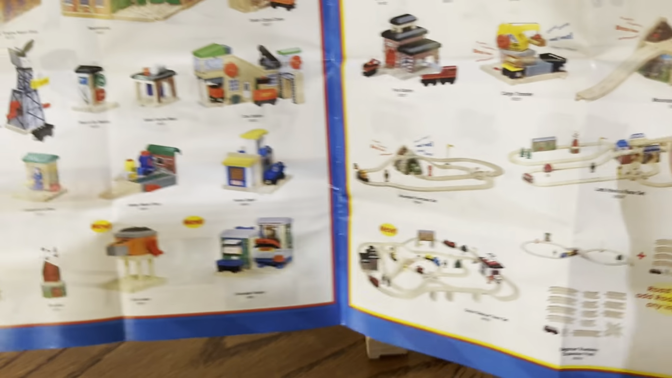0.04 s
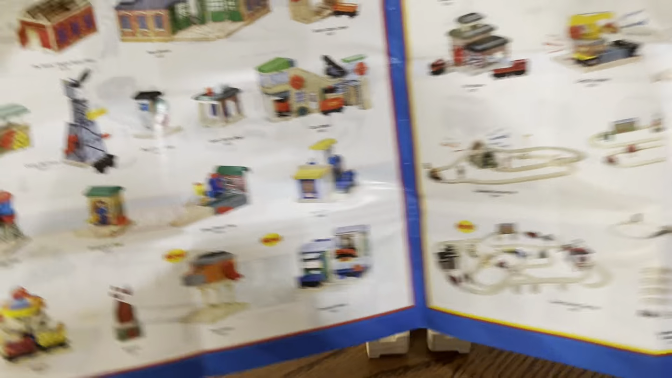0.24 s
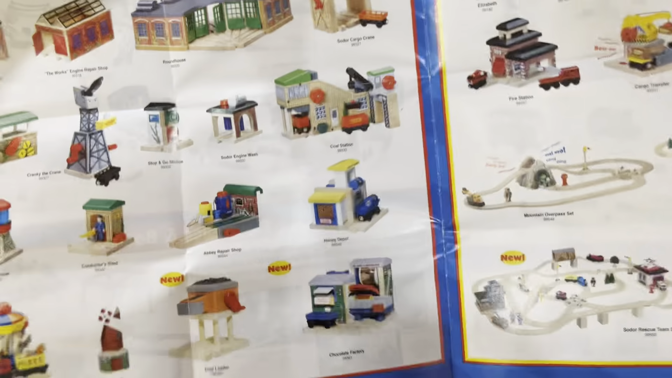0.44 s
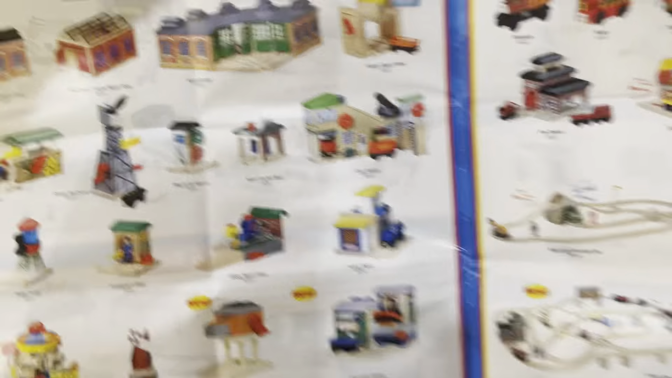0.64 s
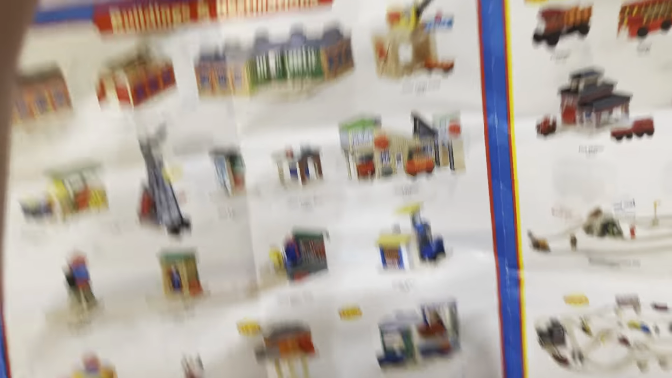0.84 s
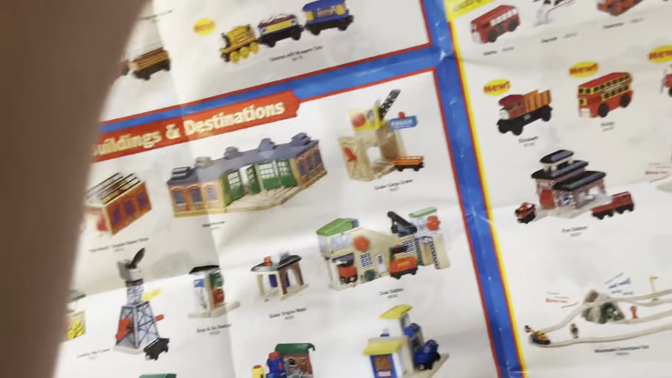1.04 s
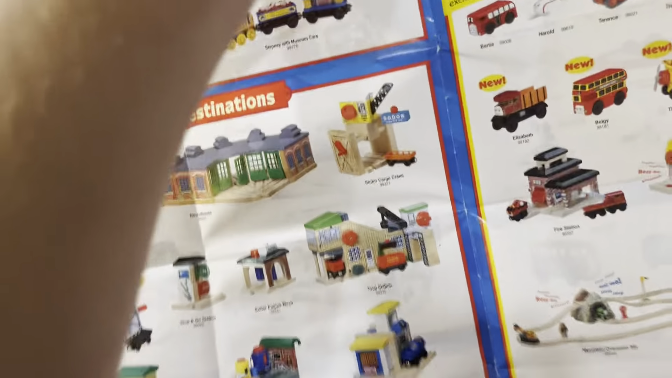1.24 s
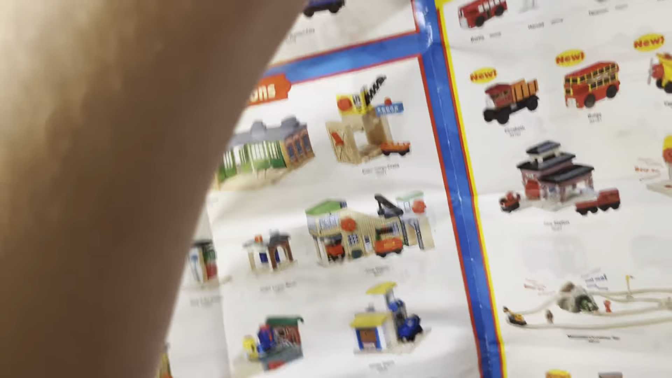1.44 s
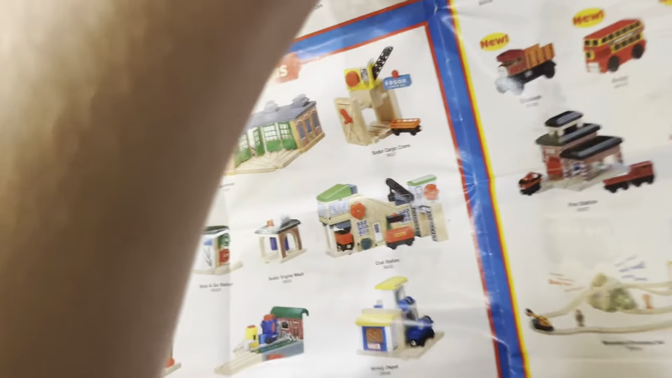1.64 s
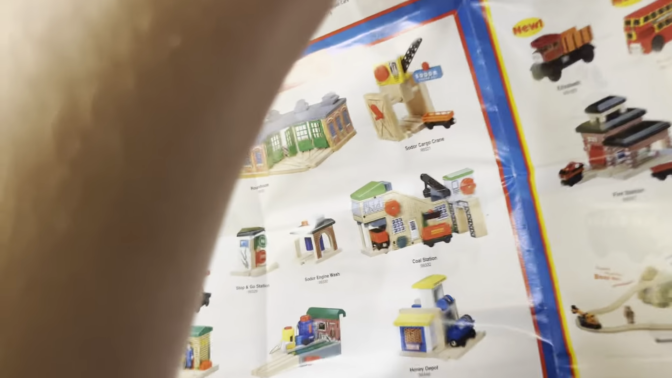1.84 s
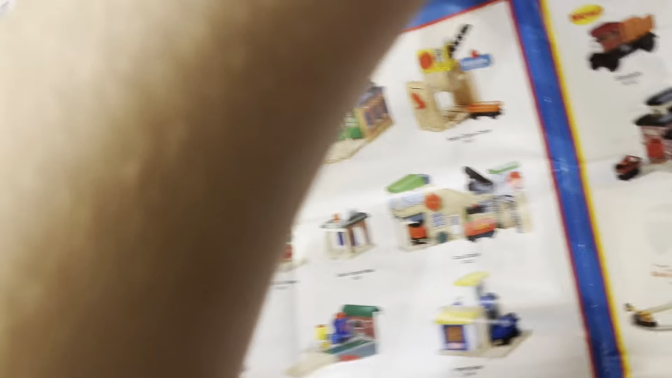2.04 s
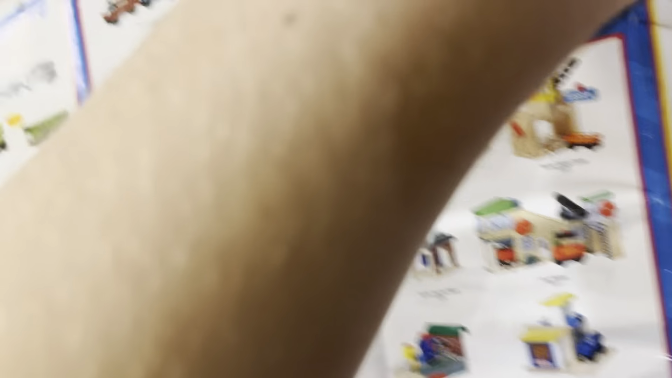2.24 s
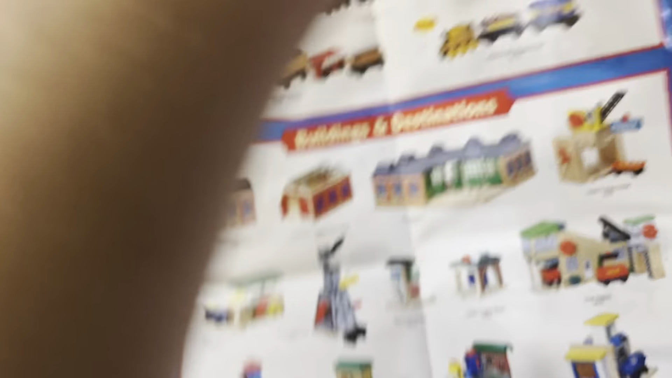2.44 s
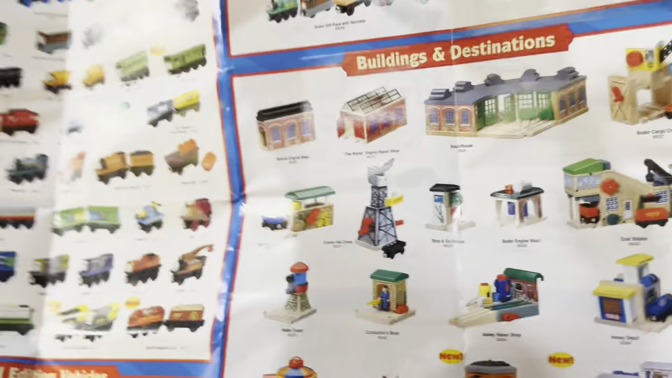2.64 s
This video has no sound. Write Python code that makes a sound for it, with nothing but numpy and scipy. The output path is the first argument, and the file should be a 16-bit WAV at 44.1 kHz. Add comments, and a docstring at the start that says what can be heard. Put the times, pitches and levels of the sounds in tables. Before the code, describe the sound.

A large folded paper leaflet is handled close to a stereo microphone in a small quiet room: irregular crisp crease snaps and crinkles, busiest in the first second, then sparser, with soft low flaps and brief sliding.

```python
"""Sharp creases snap through as a folded paper leaflet is opened close by in a quiet room.
The whole panel flaps with soft low thumps and smaller patches buckle dully: sagging damped sines.
Between the snaps the paper crinkles and slides (ringing random clicks), flutters and sways (shaped noise).
A short room tail and a faint steady noise lie behind; a microphone pair colours the whole."""
import sys
import numpy as np
from scipy import signal
from scipy.fft import rfft, irfft
from scipy.io import wavfile

SR = 44100
rng = np.random.default_rng(int(sys.argv[2]) if len(sys.argv) > 2 else 0)


def put_to_file(sound):
    """Save the sound as 16-bit audio at rate SR, in the file named by the first command-line argument."""
    columns = np.atleast_2d(sound).T  # one column per channel
    safe = np.clip(columns, -1, 1)
    whole_steps = np.round(safe * 32767)
    wavfile.write(sys.argv[1], SR, whole_steps.astype(np.int16))


N = 119070


def amp(db):
    """Decibels to gain."""
    return 10 ** (np.asarray(db) / 20)


def unit_rms(x):
    """Scales to unit rms over both channels."""
    return x / np.sqrt(np.mean(x ** 2) + 1e-20)


def read(points, hz):
    """Interpolates a table on a log-frequency axis."""
    table_hz, value = np.transpose(points)
    return np.interp(np.log(hz + 1), np.log(table_hz + 1), value)


def gain_curve(points):
    """Gain per sample from (time_s, level_db) points."""
    return amp(np.interp(np.arange(N) / SR, *np.transpose(points)))


def add(mix, start_s, sound):
    """Mixes a sound in at a time, cut at the end of the mix."""
    part = mix[:, max(round(start_s * SR), 0):][:, :sound.shape[-1]]
    part += sound[..., :part.shape[1]]


# Left-right correlation, clipped to +-0.999 on use: freq_hz, correlation
CORRELATION = [(60, 1.06), (200, 0.79), (500, 0.78), (1000, 0.29), (2200, 0.63), (5000, 0.8), (8000, -0.1),
               (15000, 41)]


def paired(x):
    """Blends two unrelated signals into a left and right correlated by band."""
    size = x.shape[1]
    a, b = rfft(x, 2 * size)
    same = np.clip(read(CORRELATION, np.fft.rfftfreq(2 * size, 1 / SR)), -.999, .999)
    mid = a * np.sqrt((1 + same) / 2)
    side = b * np.sqrt((1 - same) / 2)
    return irfft(np.array([mid + side, mid - side]))[:, :size]


def coloured(x, colour):
    """Pairs two signals and shapes their spectrum, at unit rms."""
    gain = amp(read(colour, np.fft.rfftfreq(N, 1 / SR)))
    return unit_rms(irfft(rfft(paired(x)) * gain, N))


# Spectral band centres of a snap [Hz]: body, reference, treble, air
SNAP_BANDS_HZ = [500, 1900, 5000, 12000]
# Ring of the sheet's modes: mode_hz, multiple of the snap's ring_s
RING_SCALE = [(150, 2.3), (500, 1.72), (1900, 1.19), (5000, 0.89), (9000, .5), (14000, 0.55)]
SNAP_DB, SNAP_RISE_S, SNAP_LOW_HZ = -.5, 0.00039, 197
SHEET_DB, SHEET_S = -22, 0.0096  # the bend spreads over the sheet and lingers
# The two notes stand out of an uneven cluster of modes
NOTE_DB, NOTE_OCTAVES, RIPPLE_DB, RIPPLE_HZ = 10.5, 0.14, 3.5, 219.7


def snap(level_db, body_db, treble_db, air_db, panel_hz, crease_hz, ring_s, pan_db, count=11):
    """A crease pops through: the sheet's dense modes start together and die in milliseconds, low ones last."""
    size = 4096
    t, hz = np.arange(size) / SR, np.fft.rfftfreq(size, 1 / SR)
    centres_hz = np.geomspace(150, 15000, count)
    colour = list(zip(SNAP_BANDS_HZ, [body_db, 0, treble_db, air_db]))

    ripple = np.interp(hz / RIPPLE_HZ, np.arange(size), rng.standard_normal(size))
    notes = sum(np.exp(-(np.log2((hz + 1) / note_hz) / NOTE_OCTAVES) ** 2)
                for note_hz in (panel_hz, crease_hz))
    noise = rfft(paired(rng.standard_normal((2, size))))
    modes = noise * amp(RIPPLE_DB * ripple + NOTE_DB * notes)

    rise = 1 - np.exp(-t / SNAP_RISE_S)
    linger = amp(SHEET_DB) * np.exp(-t / SHEET_S)
    out = 0
    for centre_hz, pick in zip(centres_hz, np.eye(count)):
        share = np.interp(np.log(hz + 1), np.log(centres_hz), pick)  # triangular band
        decay_s = max(ring_s, 1e-4) * read(RING_SCALE, centre_hz)
        ring = irfft(modes * share) * rise * (np.exp(-t / decay_s) + linger)
        weight = np.sqrt(np.sum(share * amp(NOTE_DB * notes)) / size)
        low_cut = 1 / (1 + (SNAP_LOW_HZ / centre_hz) ** 4)
        out = out + unit_rms(ring) * weight * low_cut * amp(read(colour, centre_hz))
    return out * amp(SNAP_DB + level_db + np.array([[pan_db], [-pan_db]]) / 2)


# Crease snaps: start_s, level_db (before SNAP_DB), body_db, treble_db, air_db (relative to level),
# panel_hz, crease_hz, ring_s (before RING_SCALE), pan_db (left minus right)
CREASE_SNAPS = [(0.002, -42.5, 8, -7, -16, 570, 3570, 0.0053, 4.5),
                (0.1694, -50.5, 13, -18, -27, 465, 1890, 0.011, 3),
                (0.217, -51.5, -1, -12, -23, 410, 1980, 0.0048, -3),
                (0.2525, -33.5, 0.5, -7.5, -30.5, 1430, 3660, 0.0049, -3),
                (0.2932, -32, 5, -4.5, -19, 475, 4180, 0.003, -1.5),
                (0.3198, -55, 1, -8, -18, 410, 4320, 0.0083, 6),
                (0.3593, -53.5, 16.5, -4.5, -18, 430, 3430, 0.0074, -2.5),
                (0.4047, -48.5, 11.5, -15, -13, 445, 2550, 0.0047, -1.5),
                (0.4248, -54.5, 14, -18, -23, 1590, 1800, 0.007, 3),
                (0.4395, -34.5, -11, -17.5, -50, 1570, 3700, 0.0031, 0.5),
                (0.4866, -57.5, 17.5, -20, -9, 503, 3270, 0.0041, -5),
                (0.517, -40.5, -1, -6.5, -1.5, 1550, 4290, 0.0074, -2.5),
                (0.5232, -40.5, 2, -5, -42, 458, 3250, 0.0035, -1),
                (0.5456, -35.5, -8, -37, -43, 1010, 2040, 0.0036, 5.5),
                (0.5673, -28.5, 5, -9, -15.5, 1380, 4380, 0.0028, 0),
                (0.6001, -53, 13, -14, -29, 394, 1810, 0.01, 13),
                (0.6709, -36.5, 7.5, -8, -13, 900, 2500, 0.0025, 1),
                (0.7906, -41.5, 3, -13, -16, 1360, 2760, 0.019, -9),
                (0.8018, -33.5, -2, -19, -33, 1520, 4350, 0.0098, 3.5),
                (0.8089, -30.5, -5, 0, 1, 1650, 4190, 0.0027, 0.5),
                (0.8549, -52, -4, -18, -25, 1570, 2290, 0.0067, -3),
                (0.8659, -28.5, -11, -6, -6.5, 1640, 2340, 0.0044, 0),
                (0.891, -27, 4, -9.5, -26, 568, 2370, 0.0044, 1.5),
                (0.9003, -44.5, 4, -6, -26, 890, 2590, 0.0051, 18),
                (0.9352, -48, -2, -29, -24, 1130, 2040, 0.0049, -1),
                (0.9663, -54.5, 12.5, -11, -25, 397, 2280, 0.0064, 19),
                (0.9886, -46, 13.5, -6.5, -2, 480, 6200, 0.0079, 2.5),
                (1.0258, -47, 11.5, -23, -20, 910, 1770, 0.0046, 3),
                (1.1728, -42, 2.5, -11.5, -18, 405, 4070, 0.01, -0.5),
                (1.3684, -49, 14.5, -12, -20, 455, 4060, 0.011, -3),
                (1.3937, -45.5, 11, -2.5, -21, 834, 4150, 0.0049, -2),
                (1.4171, -36, -2, -16, -47, 1570, 2260, 0.0031, -0.5),
                (1.442, -27.5, -2.5, -1, -10.5, 1770, 3070, 0.0023, 0.5),
                (1.4716, -50.5, 5, -4, -22, 444, 5260, 0.0018, 0),
                (1.6631, -46.5, 6, -20, -21, 1440, 1900, 0.0097, -4.5),
                (1.7012, -48, 17, -21, -20, 410, 2700, 0.0049, -2),
                (1.7579, -51, 17, -21, -11, 483, 2010, 0.0068, -7),
                (1.7666, -47, 8, -11, -6.5, 1400, 1980, 0.0098, -3),
                (1.7896, -45, 7, -16, -14, 790, 1950, 0.01, -4),
                (1.8981, -42, 11.5, -29, -49, 444, 2630, 0.0053, -14.5),
                (1.9033, -37, 9.5, -27.5, -56, 448, 2700, 0.0058, 5.5),
                (1.9104, -42.5, 16, -38, -39, 437, 1920, 0.0031, -4),
                (1.9326, -58.5, 26.5, -10, -4, 503, 2100, 0.0086, 2),
                (1.957, -49, 14, -16.5, -21, 467, 2280, 0.0025, -2),
                (2.05, -50, 14, -19, -18, 760, 3350, 0.0099, 0),
                (2.0629, -42.5, 12.5, -13, -30, 770, 3360, 0.0082, -1),
                (2.0887, -36, 8.5, 1.5, -23, 640, 3770, 0.0057, 0.5),
                (2.1145, -50.5, 13, -14, -41, 790, 2990, 0.0051, -10),
                (2.2591, -52.5, 11, -8, -9, 1180, 4390, 0.004, -1),
                (2.306, -44, 8.5, -27, -22, 1430, 2820, 0.0083, -3.5),
                (2.337, -52, 17, 0.5, -16, 465, 2110, 0.0033, 0),
                (2.3962, -36, 3, -21, -53, 1170, 2310, 0.0043, -2.5),
                (2.424, -38, 1, -7, -18.5, 1400, 2400, 0.0036, 0)]


def snaps():
    """All the creases popping through."""
    out = np.zeros((2, N))
    for start_s, *settings in CREASE_SNAPS:
        add(out, start_s, snap(*settings))
    return out


SWING_SAG = 0.085  # fraction of the starting pitch


def swing(level_db, pitch_hz, decay_s, rise_s):
    """A damped swing of a stretch of paper, its pitch sagging as it relaxes."""
    t = np.arange(SR // 4) / SR
    decay = np.exp(-t / decay_s)
    turns = np.cumsum(pitch_hz * (1 - SWING_SAG * (1 - decay))) / SR
    return amp(level_db) * (1 - np.exp(-t / rise_s)) * decay * np.sin(2 * np.pi * turns)


# Flaps of the whole panel: start_s, level_db (before the envelope), pitch_hz (before sag), decay_s
PANEL_FLAPS = [(0.224, -21.5, 59.4, 0.0073), (0.26, -60, 75, 0.023), (.345, -32, 66.3, 0.023),
               (0.403, -38, 89, 0.011), (0.529, -39, 102.4, 0.036), (.792, -27.5, 75.6, 0.03),
               (0.926, -27.5, 116, 0.017), (1.0, -36, 69.4, .025), (1.17, -19, 64, 0.016),
               (1.244, -32.5, 88, 0.027), (1.386, -31, 63, 0.022), (1.447, -21.5, 115, 0.0088),
               (1.706, -28, 125.5, 0.011), (1.765, -32, 118.6, 0.0091), (1.955, -36, 160, 0.015),
               (2.062, -40, 84.2, 0.074), (2.337, -35, 64.9, 0.042)]


def flaps():
    """The whole panel swings as one: soft low thumps."""
    out = np.zeros((2, N))
    for start_s, level_db, pitch_hz, decay_s in PANEL_FLAPS:
        add(out, start_s, swing(level_db, pitch_hz, decay_s, rise_s=.005))
    return out


# Buckles of a smaller patch: start_s, level_db (before mode level), pitch_hz (before mode ratio), decay_s
PATCH_BUCKLES = [(.176, -42.5, 392, 0.016), (.256, -33, 320, 0.0094), (.324, -38, 293, 0.009),
                 (.524, -31, 308, 0.012), (.601, -36, 327, .01), (0.788, -30, 275, 0.013),
                 (.893, -26.5, 543, 0.01), (1.702, -37.5, 422, 0.0084), (1.902, -34, 449, 0.0095),
                 (2.089, -36, 703, .012), (2.305, -46.5, 322, 0.012), (2.544, -37, 293, 0.013)]
# Modes of a patch: pitch_ratio (before random detune), level_db (relative to the buckle)
PATCH_MODES = [(.6, -6), (.8, -10.5), (1, 0.5), (1.24, -5), (1.55, -6), (2.05, -13), (2.7, -17.5)]


def buckles():
    """A smaller patch gives way: dull knocks of several damped modes, alternating in sign."""
    out = np.zeros((2, N))
    for start_s, level_db, pitch_hz, decay_s in PATCH_BUCKLES:
        for k, (ratio, mode_db) in enumerate(PATCH_MODES):
            mode_hz = pitch_hz * ratio * rng.uniform(0.93, 1.04)
            mode = swing(level_db + mode_db, mode_hz, decay_s, rise_s=.0025)
            add(out, start_s, (-1) ** k * mode)
    return out


def grains(per_s, spread_db, ring_s, count=12):
    """Random tiny clicks of uneven size, each ringing one of several patches of paper."""
    size = amp(spread_db * np.minimum(rng.exponential(1, N), 4))
    clicks = size * (rng.random(N) < per_s / SR)
    patch, t = rng.integers(0, count, N), np.arange(SR // 50) / SR
    rings = rng.standard_normal((count, 2, len(t))) * np.exp(-t / ring_s)
    return sum(signal.oaconvolve((clicks * (patch == k))[None], rings[k], axes=1)[:, :N]
               for k in range(count))


# Bending of the sheet: time_s, level_db (before CRINKLE_DB)
BENDING_LEVEL = [(0, -42.5), (.06, -60), (.13, -63), (.19, -59), (.23, -60), (.28, -48.5), (.35, -61.5),
                 (.42, -48), (.47, -57), (.53, -38.5), (.59, -43), (.65, -58), (.7, -53), (.76, -57),
                 (.83, -43.5), (.91, -33.5), (.96, -49.5), (1.02, -48), (1.13, -61), (1.19, -48.5),
                 (1.28, -65.5), (1.34, -61), (1.4, -42), (1.46, -38.5), (1.53, -60.5), (1.62, -60),
                 (1.68, -56), (1.78, -47.5), (1.86, -56.5), (1.92, -48), (2.02, -72), (2.08, -43.5),
                 (2.12, -59), (2.2, -59.5), (2.3, -49.5), (2.42, -47.5), (2.5, -59.5), (2.55, -55),
                 (2.62, -63.5), (2.7, -56)]
# Crinkle spectrum shape: freq_hz, gain_db
CRINKLE_SHAPE = [(150, -2), (400, 3.5), (900, 0), (1600, -2.5), (2400, -7), (4000, -11), (7000, -28.5),
                 (15000, -85)]
CRINKLE_DB = -4


def crinkle():
    """Bending sets off many small crinkles, each a brief ring."""
    clicks = grains(per_s=1000, spread_db=4, ring_s=0.004)
    return amp(CRINKLE_DB) * coloured(clicks, CRINKLE_SHAPE) * gain_curve(BENDING_LEVEL)


# Sliding of paper on paper and skin: time_s, level_db (before SLIDE_DB)
SLIDING_LEVEL = [(0, -64), (.12, -71.5), (.22, -69.5), (.28, -66), (.34, -64), (.41, -61), (.47, -63),
                 (.52, -52), (.59, -60), (.65, -57), (.75, -67.5), (.79, -61), (.83, -55), (.92, -43),
                 (1, -55.5), (1.13, -64), (1.19, -54), (1.24, -59.5), (1.34, -61), (1.46, -54), (1.52, -60),
                 (1.62, -65), (1.73, -67), (1.78, -46), (1.85, -64.5), (1.94, -63), (2, -81), (2.1, -60),
                 (2.17, -70), (2.3, -50.5), (2.39, -59.5), (2.47, -47), (2.55, -63.5), (2.7, -63.5)]
# Slide spectrum shape: freq_hz, gain_db
SLIDE_SHAPE = [(500, -1), (1500, -12), (3500, -4.5), (6000, -3), (8000, -9), (11000, -3.5), (14000, -7),
               (16000, -3)]
SLIDE_DB = -1.5


def slide():
    """Rubbing fibres catch and release: a dense hiss of shorter clicks."""
    clicks = grains(per_s=12000, spread_db=6, ring_s=0.0016)
    return amp(SLIDE_DB) * coloured(clicks, SLIDE_SHAPE) * gain_curve(SLIDING_LEVEL)


# Flutter of the loose sheet: time_s, level_db (before FLUTTER_DB)
FLUTTER_LEVEL = [(0.0, -41), (0.07, -66.5), (0.3, -35.5), (0.34, -56.5), (0.43, -37), (0.47, -53.5),
                 (0.57, -34), (0.65, -67), (0.68, -38.5), (0.74, -87), (0.8, -33.5), (0.85, -44),
                 (0.9, -39.5), (0.93, -41.5), (1.16, -54.5), (1.18, -43), (1.3, -57.5), (1.37, -45.5),
                 (1.46, -44), (1.5, -67), (1.64, -59), (1.71, -44.5), (1.74, -53), (1.77, -39.5),
                 (1.87, -67), (1.9, -45.5), (2.01, -52), (2.1, -58), (2.18, -61.5), (2.32, -44.5),
                 (2.52, -54), (2.55, -40.5), (2.65, -93), (2.7, -56)]
# Flutter spectrum shape: freq_hz, gain_db
FLUTTER_SHAPE = [(60, -28), (130, -3.5), (200, -1), (300, 0), (450, -1.5), (700, -16), (1500, -34),
                 (5000, -70)]
FLUTTER_DB = -4


def flutter():
    """The loose sheet flutters: low-mid noise in bursts."""
    noise = coloured(rng.standard_normal((2, N)), FLUTTER_SHAPE)
    return amp(FLUTTER_DB) * noise * gain_curve(FLUTTER_LEVEL)


# Sway of the panel: time_s, level_db (before SWAY_DB)
SWAY_LEVEL = [(0.0, -46.5), (0.18, -63.5), (0.23, -35.5), (0.49, -50), (0.55, -33), (0.6, -44.5),
              (0.78, -42), (0.8, -35.5), (1.14, -53), (1.17, -47.5), (1.33, -50.5), (1.46, -40.5),
              (1.62, -65), (1.7, -56), (2.27, -50), (2.35, -38.5), (2.63, -71.5), (2.7, -53.5)]
# Sway spectrum shape: freq_hz, gain_db
SWAY_SHAPE = [(15, -33), (35, -13), (62, 0), (85, -3.5), (130, -9.5), (200, -20), (500, -60.5), (2000, -78)]
SWAY_DB = -2.5


def sway():
    """The panel sways: bass noise that swells and fades."""
    noise = coloured(rng.standard_normal((2, N)), SWAY_SHAPE)
    return amp(SWAY_DB) * noise * gain_curve(SWAY_LEVEL)


# Room decay: freq_hz, t60_s
ROOM_T60_S = [(150, 0.35), (1000, 0.14), (5000, 0.21), (14000, 0.1)]
ROOM_DB = -20.5


def room(x):
    """A small furnished room: a short diffuse tail of noise, each band decaying at its own rate."""
    taps = paired(rng.standard_normal((2, SR // 2)))
    taps[:, :SR // 200] = 0  # 5 ms before the first reflections
    hz, t, bins = signal.stft(taps, SR, nperseg=256)
    decay = amp(-60 * t / read(ROOM_T60_S, hz)[:, None])
    tail = signal.istft(bins * decay, SR, nperseg=256)[1]
    wet = signal.fftconvolve(x, tail / np.linalg.norm(tail[0]), axes=1)[:, :N]
    return amp(ROOM_DB) * wet


# Quiet-room spectrum shape: freq_hz, gain_db
QUIET_SHAPE = [(15, -56), (25, -17), (71, 10), (305, -9), (684, -40.5), (6550, -18), (8350, -55),
               (11500, -71), (15500, -55)]
QUIET_DB = -74


def quiet():
    """The quiet of the room: faint steady shaped noise."""
    return amp(QUIET_DB) * coloured(rng.standard_normal((2, N)), QUIET_SHAPE)


def scene():
    """The leaflet, its echo and the quiet of the room."""
    paper = snaps() + flaps() + buckles() + crinkle() + slide() + flutter() + sway()
    return paper + room(paper) + quiet()


# Phase lead of left over right: freq_hz, lead_rad
LEFT_LEAD = [(2000, 0), (3400, 0.91), (5000, 1.1), (6500, -1), (8400, -3), (11500, -6.5), (13500, -7.5),
             (15500, -9.4)]
# Microphone response, before left-right offset and band limits: freq_hz, gain_db
MIC_RESPONSE = [(40, 2), (150, 2.5), (700, -0.5), (1000, 4), (1700, -1.5), (2350, 2), (3200, 0.5),
                (4400, 3), (5400, 2), (7000, 1.5), (11500, -0.5), (14000, -5), (16000, -5)]
LEFT_DB, LOW_CUT_HZ, EDGE_HZ = 1.5, 28, 16300  # LEFT_DB: left minus right


def record(dry):
    """Two microphone ports colour the sound and part in phase in the treble; then the band limits."""
    hz = np.fft.rfftfreq(2 * N, 1 / SR)
    sides = np.array([[.5], [-.5]])
    ports = amp(read(MIC_RESPONSE, hz) + sides * LEFT_DB) * np.exp(1j * sides * read(LEFT_LEAD, hz))
    low_cut = hz ** 2 / np.hypot(hz ** 2, LOW_CUT_HZ ** 2)
    heard = irfft(rfft(dry, 2 * N) * ports * low_cut)[:, :N]
    lowpass = signal.firwin(301, EDGE_HZ, window=("kaiser", 9), fs=SR)
    return signal.oaconvolve(heard, lowpass[None], "same")


dry = scene()
out = record(dry)
put_to_file(out)
```